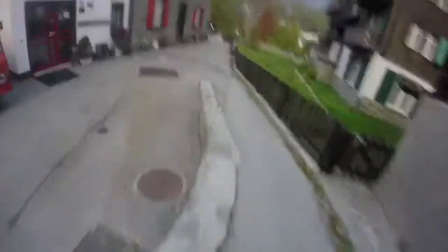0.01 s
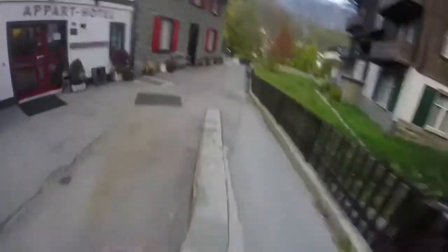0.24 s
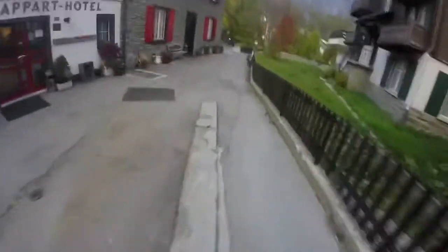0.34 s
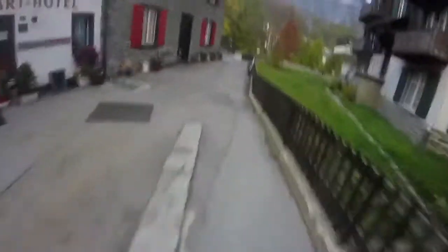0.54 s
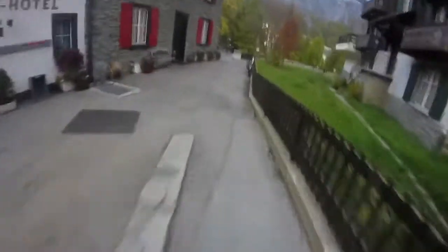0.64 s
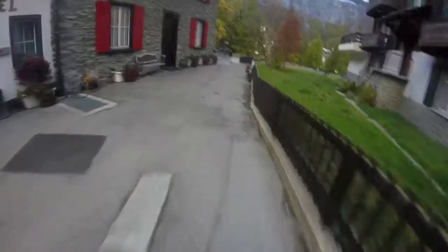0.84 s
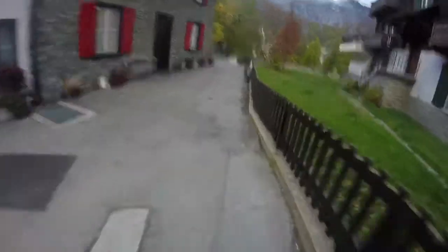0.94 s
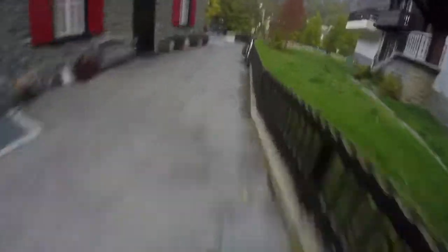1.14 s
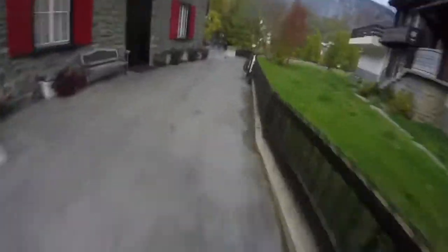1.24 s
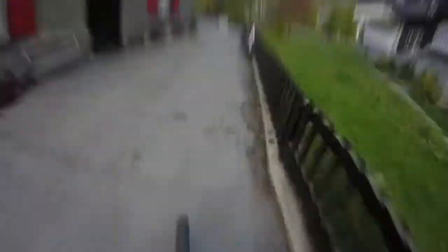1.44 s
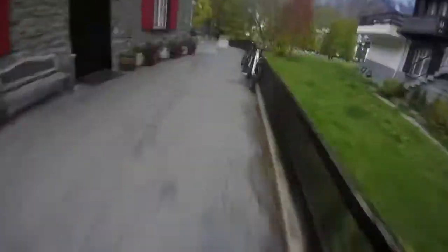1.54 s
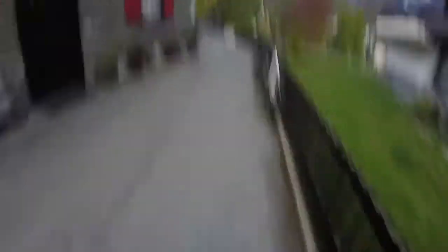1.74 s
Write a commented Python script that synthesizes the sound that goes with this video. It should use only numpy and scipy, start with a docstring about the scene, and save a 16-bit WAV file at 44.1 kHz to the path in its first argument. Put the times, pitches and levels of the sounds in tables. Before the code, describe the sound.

A coasting bicycle knocks and rattles sharply over rough patches of paved lane, with faint wind rush

```python
"""Tyre buzz from a paved lane comes up the frame of a coasting bicycle and hums in the shell of a camera fixed to it:
noise rings the shell's modes. Wind is low noise in lumpy gusts over a deep sway; a broad rush lies above it.
Three rough patches jolt the mount (short swinging cosines); loose parts knock sharply (clicks into shell modes)
and the chain rattles (random link contacts ringing shell and chain)."""
import sys
import numpy as np
from scipy import signal
from scipy.io import wavfile

SR = 44100
rng = np.random.default_rng(int(sys.argv[2]) if len(sys.argv) > 2 else 0)


def to_wav(sig):
    """Store sig (one row per channel, or 1-D mono) as 16-bit WAV at the path in sys.argv[1].

    Samples outside -1..1 are clipped; the rate is SR.
    """
    pcm = np.clip(np.atleast_2d(sig), -1, 1) * 32767
    pcm = np.round(pcm).astype(np.int16)
    wavfile.write(sys.argv[1], SR, pcm.T)  # frames by channels


N = 77175

# modes of the shell: mode_hz, buzz_db, hit_db (knocks and rattles), t60_s
SHELL_MODES = [(1305, -5, -7, 0.023), (1573, -2, -6.5, 0.022), (1642, -51, 1, 0.011),
               (2250, -3.5, 11.5, 0.0049), (2325, -18, -4.5, 0.026), (2696, -5, 5.5, 0.013),
               (3149, -11, -6.5, 0.026), (3460, -13, 0, 0.0056), (4005, -25, -4.5, 0.014),
               (4430, -17, -1, 0.0063), (6130, -15.5, -2, 0.0031), (6970, -34.5, 2, 0.0037)]


def amp(db):
    """Decibels to gain."""
    return 10 ** (np.asarray(db) / 20)


def rms_one(x):
    """Scale to rms 1."""
    return x / np.sqrt(np.mean(x ** 2) + 1e-20)


def in_time(rows, column=1):
    """Interpolate a table column at every sample; column 0 is time in s."""
    rows = np.array(rows)
    return np.interp(np.arange(N) / SR, rows[:, 0], rows[:, column])


def drift(rate_hz):
    """Slow random curve of rms 1: two-pole low-passed noise, computed every 40 samples."""
    step = 40
    pole = np.exp(-2 * np.pi * rate_hz * step / SR)
    noise = rng.standard_normal(N // step + 2002)
    slow = signal.lfilter([1], [1, -2 * pole, pole * pole], noise)[2000:]  # drop the run-in
    return np.interp(np.arange(N) / step, np.arange(len(slow)), rms_one(slow))


def ring(x, hz, t60_s):
    """Two-pole resonator: a unit click starts a decaying sine of height 1."""
    radius = amp(-60 / (t60_s * SR))
    w = 2 * np.pi * hz / SR
    return signal.lfilter([0, np.sin(w)], [1, -2 * radius * np.cos(w), radius * radius], x + 1e-18)


def band(low_hz, high_hz, order=2):
    """Band-passed white noise, filter run-in dropped."""
    sos = signal.butter(order, [low_hz, high_hz], "band", fs=SR, output="sos")
    return signal.sosfilt(sos, rng.standard_normal(N + 9000))[9000:]


def tyre_buzz():
    """Road noise carried up the frame keeps the shell's modes humming, each with its own flutter."""
    # buzz strength: time_s, level_db (before the 3 dB cut below), upper_modes_db (all but the lowest two)
    buzz_curve = [(0, -61, 0.5), (.14, -52.5, -4.5), (.152, -49, 1.5), (.178, -52.5, -1.5),
                  (.225, -41, -3.5), (.238, -47.5, -0.5), (.28, -55.5, 0), (.33, -49, -4), (.4, -48.5, -5),
                  (.44, -61, 4.5), (.5, -55, -1.5), (.6, -58.5, -5), (.88, -62, -1), (.925, -48, -11.5),
                  (.96, -56.5, -3.5), (1.04, -54.5, -4.5), (1.09, -55, 3), (1.225, -62.5, -1),
                  (1.25, -52, -3.5), (1.33, -53.5, 1), (1.4, -57.5, 8), (1.48, -54, -3.5),
                  (1.55, -58.5, -1), (1.75, -60, -4)]
    flutter_db = 2.5
    upper_gain = amp(in_time(buzz_curve, column=2))
    hum = np.zeros(N)
    for k, (hz, buzz_db, _, t60_s) in enumerate(SHELL_MODES):
        mode = rms_one(ring(rng.standard_normal(N), hz, t60_s))
        mode = mode * amp(buzz_db + flutter_db * drift(23.4))
        hum += mode * upper_gain if k > 1 else mode
    return amp(in_time(buzz_curve) - 3 + 1.5 * drift(30)) * hum


def rush():
    """Wind and road rush: broad noise in half-octave bands, each flickering a little."""
    # relative spectrum: freq_hz, density_db (per Hz)
    rush_spectrum = [(41, -31), (70, 0.5), (161, -4), (511, -18.5), (572, -11), (1130, -15), (1550, -50),
                     (1850, -17), (3190, -23), (10800, -34.5), (15500, -36)]
    rush_db, flicker_db = -61.5, -3
    hz, density_db = np.transpose(rush_spectrum)
    edges_hz = np.append(64 * 2 ** np.arange(0, 8, .5), 17000)
    out = np.zeros(N)
    for low_hz, high_hz in zip(edges_hz, edges_hz[1:]):
        centre_log = np.log(low_hz * high_hz) / 2
        band_db = np.interp(centre_log, np.log(hz), density_db)
        out += amp(band_db + flicker_db * drift(24)) * band(low_hz, high_hz)
    return amp(rush_db) * rms_one(out)


def wind():
    """Low wind noise on the microphone in lumpy gusts, over a deep sway of the mount."""
    # gust level: time_s, level_db
    gust_curve = [(0, -62.5), (.16, -55.5), (.38, -51), (.45, -62), (.6, -58), (.88, -64.5), (1.05, -54.5),
                  (1.26, -60), (1.46, -53), (1.6, -62.5), (1.75, -65)]
    sway_db = -42.5
    gust = rms_one(band(61, 292) * amp(2 * drift(14)))
    sway = rms_one(band(6.1, 34.3, order=3))
    return amp(in_time(gust_curve)) * gust + amp(sway_db) * sway


def jolts():
    """Bumps swing the mount, and dull thuds sound under knocks: a smooth rise, then a quickly dying wobble."""
    # bumps, and dull thuds under knocks (the 123 and 260 Hz rows):
    # peak_s, peak_db, pitch_hz, direction (+-1), fall_cycles
    jolt_rows = [(0.173, -21.5, 11.2, -1, 0.3), (0.237, -8, 16.7, 1, 0.38), (0.2446, -17.5, 123, 1, 0.2),
                 (.257, -2.5, 44, -1, .55), (0.329, -18, 18.4, 1, 0.3), (0.93, -28.5, 26, 1, 0.26),
                 (1.016, -19.5, 30.7, -1, 0.54), (1.043, -34.5, 260, -1, 0.82), (1.276, -27.5, 19, 1, 0.26),
                 (1.334, -21.5, 16.5, 1, 0.91), (1.384, -15.5, 21.7, -1, 0.12),
                 (1.443, -21, 15.9, 1, 0.33),]
    rise_cycles = 0.25
    out = np.zeros(N)
    for peak_s, peak_db, hz, direction, fall_cycles in jolt_rows:
        cycles = (np.arange(N) / SR - peak_s) * hz
        rise = np.exp(-(cycles / rise_cycles) ** 2 / 2)
        late = np.maximum(cycles, 0) / fall_cycles
        dying = 1 / np.cosh(np.minimum(late, 50))
        shape = np.where(cycles < 0, rise, dying)
        out += np.sign(direction) * amp(peak_db) * shape * np.cos(2 * np.pi * cycles)
    return out


def rattles():
    """Uneven link contacts, dying away, ring the shell and the chain and crackle."""
    # rattles: start_s, level_db (before the 11 dB lift below), fall_s (to -30 dB), tilt_db (per octave; also
    # added to the crackle), chain_db, favoured_hz
    rattle_rows = [(0.187, -49, 0.033, -5, 6, 6250), (0.196, -37, 0.019, 2.5, 10.5, 4650),
                   (.203, -43, 0.02, -12, 10, 10040), (0.219, -30, 0.0073, -5, -12, 6250),
                   (0.29, -34.5, 0.0057, 3.5, -7, 7200), (.347, -41, 0.007, 1, 14, 4650),
                   (0.3546, -37, 0.019, -1, 12, 6250), (1.051, -22.5, 0.0047, 3, -28, 4350),
                   (1.061, -41, 0.025, -13, -26, 3200), (1.299, -49.5, 0.032, -4.5, 10, 6250),
                   (1.328, -64, 0.066, -2, 13, 7200), (1.363, -51, 0.025, -23, 14, 3200),
                   (1.451, -40, 0.035, -8.5, 9, 6250)]
    # chain modes: mode_hz, level_db, t60_s
    chain_modes = [(2350, -20, 0.014), (3200, 1.5, 0.021), (4290, -3.5, 0.021), (4770, -10, 0.022),
                   (6250, -14, 0.0091), (7200, -12, 0.011), (10040, -30, 0.05)]
    links_per_s, link_spread_db, rise_s = 3500, 3, .003
    favoured_db = 2.5  # replaces the level of chain modes near favoured_hz
    crackle_db, crackle_hz, crackle_t60_s = -7.5, 9000, 0.0014
    out, t = np.zeros(N), np.arange(7000) / SR
    for start_s, db, fall_s, tilt_db, chain_db, favoured_hz in rattle_rows:
        contacts = rng.random(len(t)) < links_per_s / SR
        sizes = amp(link_spread_db * np.minimum(rng.exponential(1, len(t)), 3)) * contacts
        sizes = sizes * (1 - np.exp(-(t / rise_s) ** 2)) * amp(-30 * t / fall_s)

        modes = [(hz, hit_db + tilt_db * np.log2(hz / 2700), t60_s) for hz, _, hit_db, t60_s in SHELL_MODES]
        for hz, level_db, t60_s in chain_modes:
            favoured = abs(np.log(hz / favoured_hz)) < .1
            modes.append((hz, chain_db + (favoured_db if favoured else level_db), t60_s))

        sound = np.zeros(len(t))
        for hz, level_db, t60_s in modes:
            hits = sizes * rng.standard_normal(len(t))
            sound += amp(level_db) * ring(hits, hz, t60_s) / np.sqrt(t60_s * SR)
        crackle_hits = sizes * np.exp(-t / fall_s) * rng.standard_normal(len(t))
        sound += amp(crackle_db + tilt_db) * ring(crackle_hits, crackle_hz, crackle_t60_s)
        first = int(start_s * SR)
        out[first:first + len(t)] += amp(db + 11) * sound
    return out


def knocks():
    """A light touch, the main blow and two bounces ring the shell with a crack; the body adds a dull thud."""
    # knocks: blow_s, shell_peak_db, contact_cutoff_hz, body_db, main_ring_lift_db
    knock_rows = [(0.2485, -14, 7460, -25.5, 3.5), (0.308, -30.5, 11800, -47, -2),
                  (1.0451, -36, 1400, -35.5, 8), (1.057, -25, 7000, -38, 2.5),
                  (1.129, -21.5, 7200, -59, 3.5), (1.3691, -23.5, 9000, -37, -1.5),
                  (1.4173, -19, 7900, -38, 5)]
    # dull body of the mount: mode_hz, level_db, t60_s
    body_modes = [(340, -2.5, 0.016), (658, -6, 0.017), (820, -10, 0.025), (1118, -1, .012)]
    main_ring_hz = 2680
    lead_s, lead_db, bounce_s, bounce_db = .0022, -9, .0017, -7
    crack_db, crack_hz, crack_t60_s, crack_fall_s = -15.5, 7200, 0.00052, .0017
    hit_s = np.array([-lead_s, 0, bounce_s, 2 * bounce_s])
    hit_levels_db = np.array([lead_db, 0, bounce_db, 2 * bounce_db])
    out, t = np.zeros(N), np.arange(3000) / SR - .005  # nominal blow at t = 0
    luck = rng.standard_normal((len(knock_rows), 4, len(SHELL_MODES)))
    highpass = signal.butter(2, 1100, "high", fs=SR, output="sos")
    for (blow_s, db, cutoff_hz, body_db, lift_db), chance in zip(knock_rows, luck):
        at = np.searchsorted(t, hit_s * rng.uniform(.8, 1.2, 4))
        shell = np.zeros(len(t))
        for k, (hz, _, mode_db, t60_s) in enumerate(SHELL_MODES):
            clicks = np.zeros(len(t))
            sign = (-1) ** (k // 2)
            clicks[at] = sign * amp(hit_levels_db + mode_db + 3 * chance[:, k])
            if abs(np.log(hz / main_ring_hz)) < .06:
                clicks[at[1]] *= amp(lift_db)
            shell -= ring(clicks, hz, t60_s) / (1 + (hz / cutoff_hz) ** 4)
        shell = signal.sosfilt(highpass, shell)

        crack = ring(rng.standard_normal(len(t)), crack_hz, crack_t60_s)
        crack = crack * np.exp(-np.abs(t) / crack_fall_s) * (t > -lead_s)
        crack = amp(crack_db) * crack / (1 + (crack_hz / cutoff_hz) ** 4)
        sound = shell / np.abs(shell).max() + crack

        blow = np.zeros(len(t))
        blow[at[1]] = 1
        thud = sum(amp(level_db) * ring(blow, hz, t60_s) for hz, level_db, t60_s in body_modes)
        first = int((blow_s + t[0]) * SR)
        out[first:first + len(t)] += amp(db) * sound - amp(body_db) * thud
    return out


def scene():
    """All sources reach one microphone."""
    return (tyre_buzz() + rush() + wind() + jolts() + rattles() + knocks())[None]


def record(dry):
    """Steep low-pass cuts the top."""
    cutoff_hz = 15700  # stopband edge, 60 dB down
    return signal.sosfilt(signal.cheby2(12, 60, cutoff_hz, fs=SR, output="sos"), dry)


dry = scene()
out = record(dry)
to_wav(out)
```